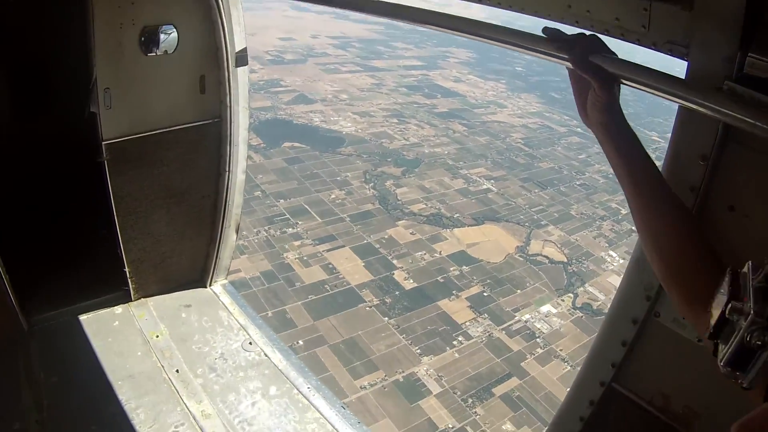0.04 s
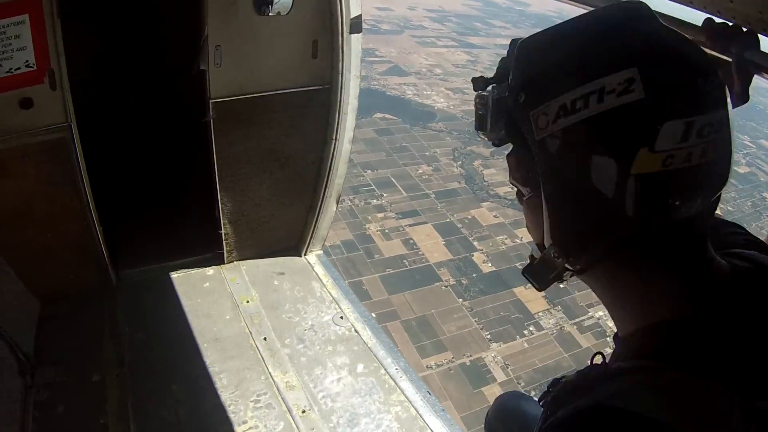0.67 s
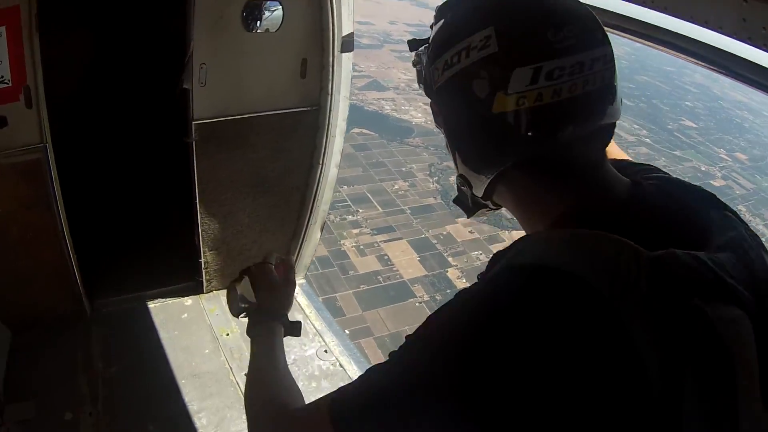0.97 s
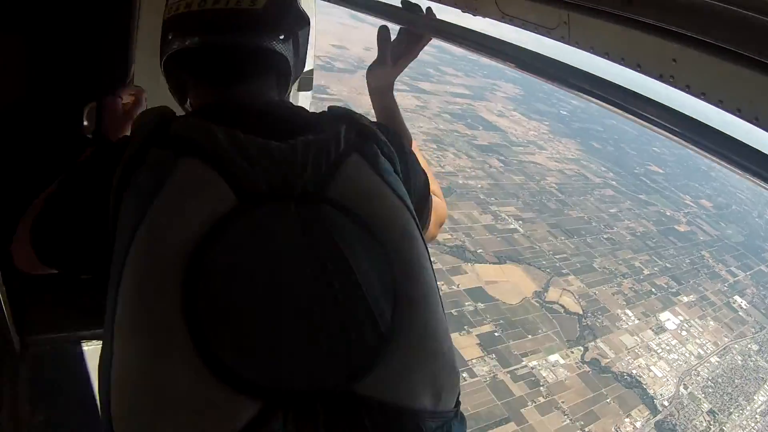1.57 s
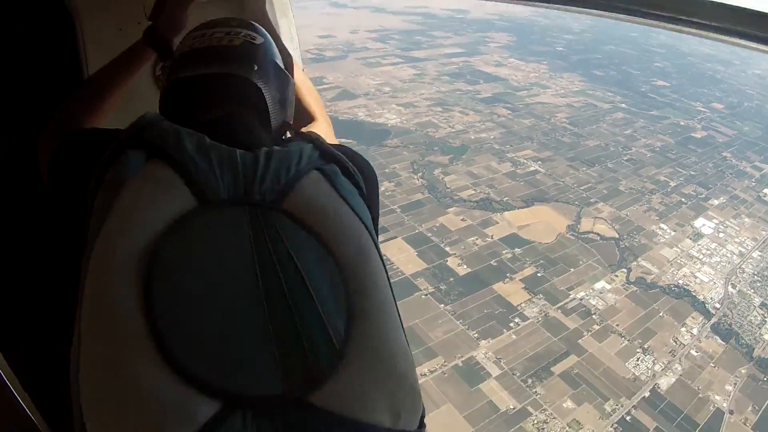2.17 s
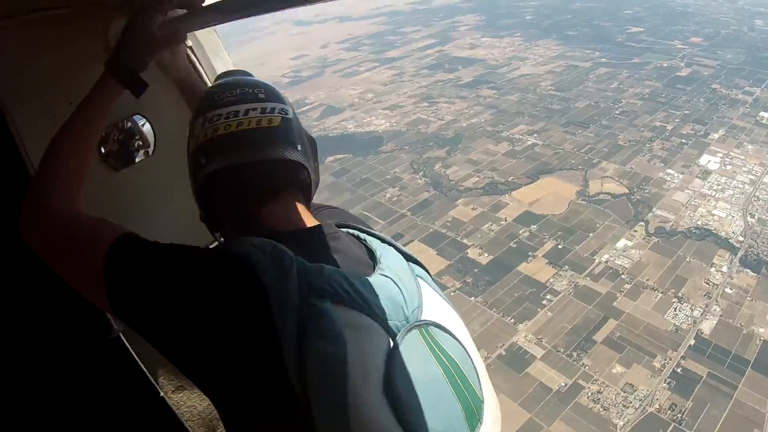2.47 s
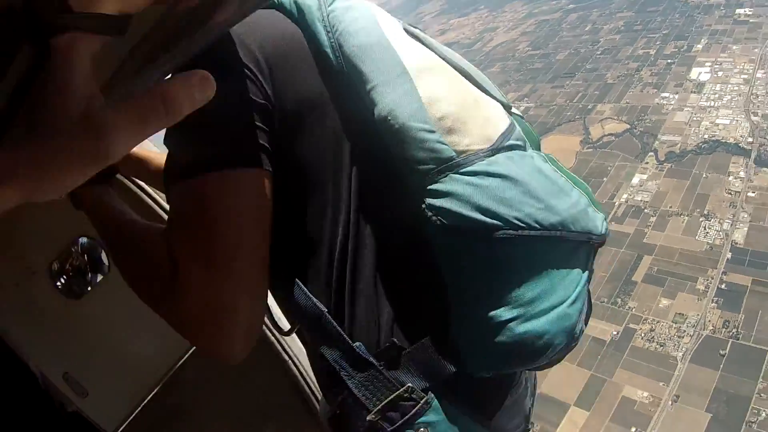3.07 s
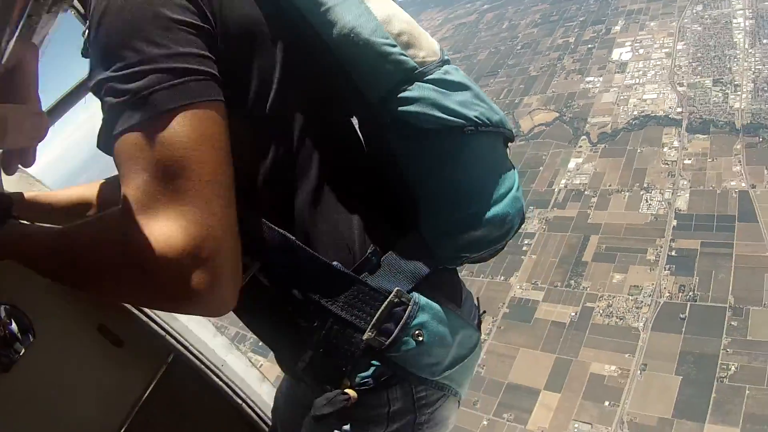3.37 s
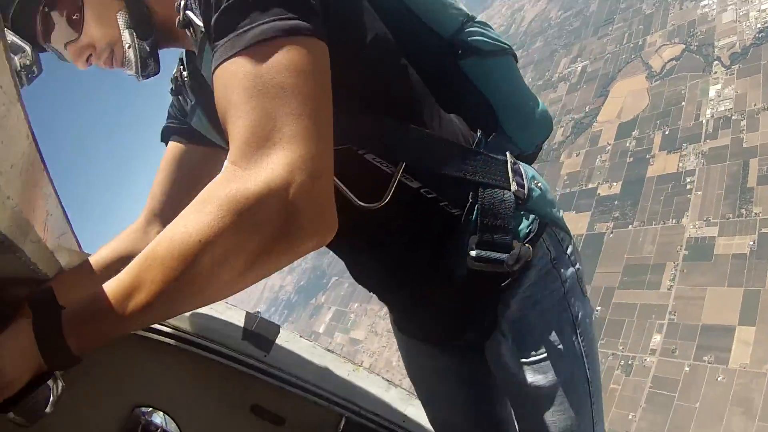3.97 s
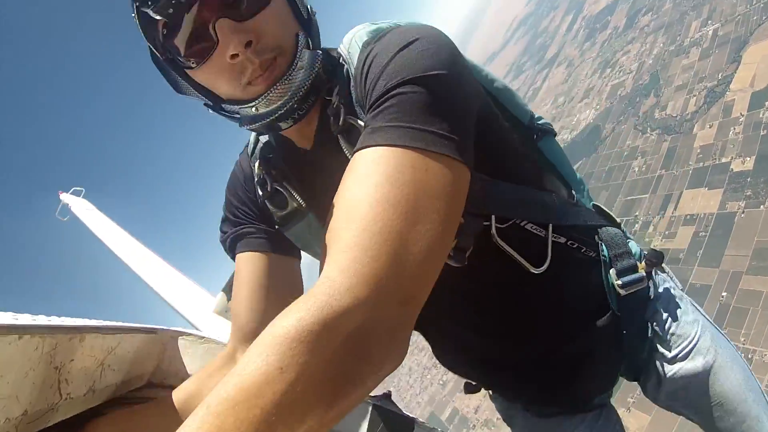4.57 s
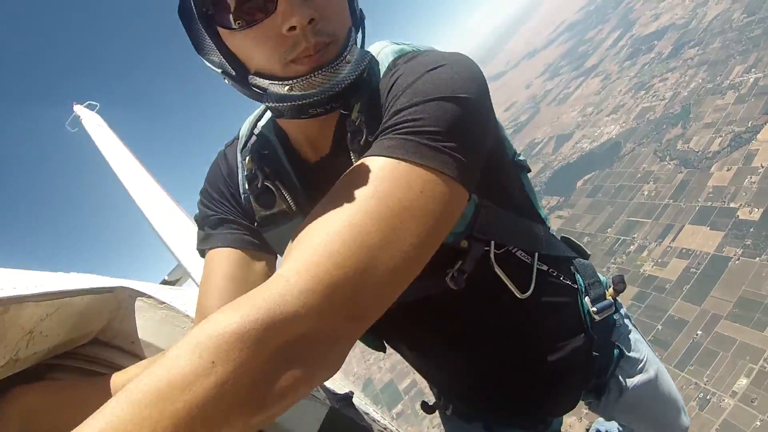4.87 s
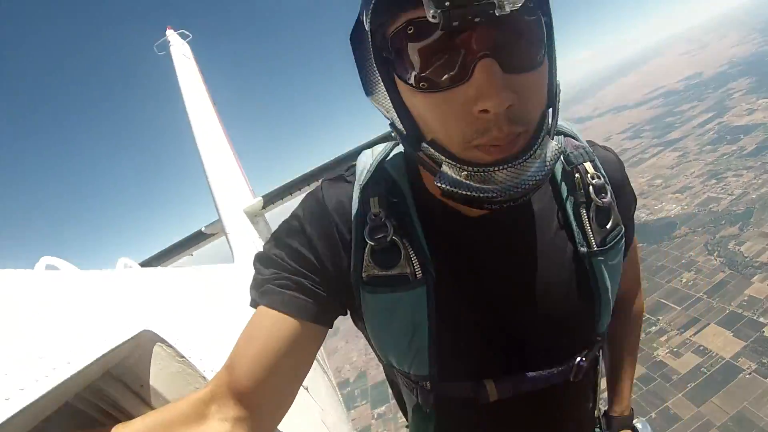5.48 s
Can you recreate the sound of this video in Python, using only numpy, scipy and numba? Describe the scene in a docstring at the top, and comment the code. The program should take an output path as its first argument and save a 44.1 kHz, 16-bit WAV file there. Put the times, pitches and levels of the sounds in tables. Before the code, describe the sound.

An aircraft engine roars and whines through an open door, with brief knocks, until buffeting, crackling wind takes over the microphone.

```python
"""A helmet camera's microphone in a jump plane, close to the open door. A low boom swells throughout. At
first the cabin roars under the turbine's whine, and the slipstream hisses and howls along the door frame.
Around 2 s, knocks on the camera make its limiter duck; then gear scuffs the frame and the hiss swells at
the door. Just after 4 s the microphone is out in the airstream: the aircraft drops behind the wind, and
eddies buffet the port and tear into crackle."""
import sys
import numpy as np
from scipy import signal
from scipy.fft import rfft, irfft
from scipy.io import wavfile
from scipy.ndimage import uniform_filter1d
from numba import njit

SR = 44100
rng = np.random.default_rng(int(sys.argv[2]) if len(sys.argv) > 2 else 0)


def store_wav(level_fs):
    """Save 16-bit WAV to argv[1]."""
    pcm = np.round(np.clip(np.atleast_2d(level_fs), -1, 1) * 32767)
    wavfile.write(sys.argv[1], SR, pcm.T.astype(np.int16))


N = 244314
TIME = np.arange(N) / SR
FREQS = np.maximum(np.arange(N // 2 + 1) * SR / N, 1)

# loudness of slipstream and engine, ducked after the knocks, swelling at the door, fading outside:
# (time [s], relative level [dB])
LOUDNESS = [(0, 0), (1.2, 1.5), (1.9, 0.5), (2.12, -6.5), (2.3, 5), (2.64, 5), (2.72, 4), (3.4, 10.5),
            (3.93, 10.5), (4.08, 8), (4.3, 2.5), (4.7, -4.5), (5.54, -14)]
# engine roar from inside the cabin: (frequency [Hz], relative level [dB])
ROAR_SPECTRUM = [(150, 8), (280, 0), (600, 3), (850, -3), (1350, -4.5), (1700, -12.5), (2350, -10),
                 (2560, -19), (3400, -15), (4200, -22), (6000, -19.5), (8500, -37), (13000, -35),
                 (16000, -60)]
# cabin resonances and narrow engine bands: (frequency [Hz], width [Hz], lift [dB])
CABIN_PEAKS = [(440, 103, 7.5), (1044, 176, 9.5), (1400, 42, 7), (2080, 480, 10), (2412, 15, 12),
               (4750, 120, 6), (5450, 310, 5)]
# air passing the door edge: (frequency [Hz], relative level [dB])
HISS_SPECTRUM = [(500, -18), (1100, 1.5), (1650, -1), (2100, 2.5), (2900, -7.5), (4200, -11), (6200, -15),
                 (7000, -15.5), (9600, -19), (10600, -25.5), (12300, -25), (15500, -37)]
# door frame resonances and one notch: (frequency [Hz], width [Hz], lift [dB])
DOOR_PEAKS = [(1130, 250, -13), (1974, 200, 7.5), (4680, 120, 5), (4900, 130, 9.5), (5540, 73, 2.5),
              (6100, 400, 7), (8100, 300, 4.5)]
# slipstream howling along the frame: (time [s], pitch [Hz])
HOWL_PITCH = [(1.85, 1130), (2.25, 1005), (2.65, 1027), (2.85, 1145), (4.0, 1108)]
# the microphone turns towards the engine: (time [s], length [s], lift [dB])
WHINE_FLARES = [(2.4, 0.99, 7.5), (3.834, 0.52, 9.5)]
# slow pressure swells in the low boom: (time [s], lift [dB])
BOOM_SURGES = [(.58, 5), (.83, 6), (1.158, 5.5), (1.68, 9), (2.02, 17.5), (2.92, 4.5), (3.18, 5), (3.98, 6),
               (4.14, 10), (4.83, 7), (5.24, 8)]
# low air noise at the microphone: (frequency [Hz], relative level [dB])
RUMBLE_SPECTRUM = [(35, -24), (55, 2.5), (85, 0), (110, -5.5), (165, -1.5), (215, -7.5), (280, -21),
                   (500, -34)]
# bumps on the camera: (time [s], strength [dB], settled pitch [Hz], softened above [Hz])
KNOCKS = [(1.9198, 13.5, 141, 3230), (1.932, -1, 200, 705), (1.952, 14.5, 94, 227), (1.977, 12, 45, 143),
          (2.043, -12, 200, 550), (2.1516, 6, 229, 1100), (2.691, -3, 78, 250)]
# ringing of the camera case: (frequency [Hz], level [dB], t60 [s])
CASE_MODES = [(154, -12, 0.21), (239, -19.5, 0.17), (341, -7, 0.02), (467, -41, .045), (629, -17, 0.085),
              (870, -11.5, 0.018)]
# clicks of the plastic mount: (time [s], level [dB])
CLICKS = [(1.922, -24), (1.9588, -21), (1.9675, -40)]
# colour of a click: (frequency [Hz], relative level [dB])
CLICK_SPECTRUM = [(1500, -2), (3200, 0), (4600, -2), (5600, -18), (9000, -20), (15000, -28)]
# gear scuffing the door frame: (time [s], strength [dB])
TAPS = [(2.625, -18), (2.6275, -32), (2.632, -21)]
# ringing of the door frame: (frequency [Hz], level [dB], t60 [s])
FRAME_MODES = [(1040, 3, 0.022), (1180, -5, 0.011), (1940, -6, 0.018), (3060, -28, 0.0098)]
# flow at the microphone port: (time [s], speed [share of full], turbulence [dB])
AIRSTREAM = [(3.8, 0.16, -50), (4.05, 0.59, -44), (4.17, 0.53, -37), (4.22, 0.9, -21), (4.31, 1.09, -17),
             (4.37, 0.99, -11), (4.58, 1.03, -4), (4.92, 0.86, -1), (5.14, 1.1, -2), (5.26, 0.67, -5),
             (5.54, 0.84, -2)]
# gusts tearing at the port: (time [s], lift [dB])
GUSTS = [(4.372, 4.5), (4.475, 4.5), (4.66, 2), (4.782, 4), (4.89, 4), (4.98, 3.5), (5.125, 2), (5.185, 2)]
# the larger swirls: (frequency [Hz], relative level [dB])
CHURN_SPECTRUM = [(120, -1.5), (230, -3), (350, 1), (500, -6.5), (750, -16), (1100, -10.5), (1600, -20.5),
                  (2400, -20.5), (3500, -54)]
# the finest swirls: (frequency [Hz], relative level [dB])
CRACKLE_SPECTRUM = [(500, -0.5), (1100, 8), (1700, 3.5), (2250, 9), (2700, -4), (3300, -2.5), (4300, -9),
                    (6200, -10), (7200, -15), (8000, -14.5), (8600, -20), (9800, -20), (15000, -37)]
# air pockets round the mount: (frequency [Hz], width [Hz], lift [dB])
POCKET_PEAKS = [(714, 82, 19.5), (1010, 91, 8), (3780, 160, 4), (4860, 300, 5)]
# sharp gusts or loose cloth snapping: (time [s], level [dB])
SNAPS = [(4.3505, -24), (4.3745, -23), (4.447, -31), (4.776, -19.5), (4.789, -37), (5.092, -23),
         (5.116, -26)]
# colour of a snap: (frequency [Hz], relative level [dB])
SNAP_SPECTRUM = [(300, -17), (600, 7), (1300, 2.5), (2400, -5), (3400, -19.5), (8000, -34), (14000, -61)]


def from_db(db):
    """Decibels to gain."""
    return 10 ** (np.asarray(db) / 20)


def rms_one(x):
    """Scale to unit rms."""
    return x / np.sqrt(np.mean(x ** 2) + 1e-20)


def in_time(rows):
    """Each column of a curve at every sample."""
    times, *columns = np.transpose(rows)
    return [np.interp(TIME, times, column) for column in columns]


def swell(centre_s, length_s):
    """A smooth rise from 0 to 1 and back."""
    return np.cos(np.pi * np.clip((TIME - centre_s) / length_s, -.5, .5)) ** 2


def noise(gain):
    """Unit noise with the given gain at each frequency."""
    return rms_one(irfft(rfft(rng.standard_normal(N)) * gain, N))


def coloured_noise(spectrum, peaks=()):
    """Unit noise on a broad slope with bell-shaped resonances, rolled off past both ends."""
    hz, db = np.transpose(spectrum)
    slope = np.interp(np.log(FREQS), np.log(hz), db)
    bells = sum(lift / (1 + (2 * (FREQS - centre) / width) ** 2) for centre, width, lift in peaks)
    roll_off = np.minimum(FREQS / hz[0], 1) ** 2 * np.minimum(hz[-1] / FREQS, 1) ** 2
    return noise(from_db(slope + bells) * roll_off)


def band_noise(hz, half_width_hz):
    """Unit noise in a band, like a resonance kept ringing by turbulence."""
    return noise(1 / (1 + ((FREQS - hz) / half_width_hz) ** 4))


def drift(rate_hz):
    """Random wavering up to about the given rate, spread 1."""
    return noise(1 / (1 + (FREQS / rate_hz) ** 2))


def evened(x, seconds):
    """Take the slow swells out of a noise, leaving rms near 1."""
    power = uniform_filter1d(x ** 2, int(seconds * SR))
    return x / np.sqrt(uniform_filter1d(power, int(seconds * SR / 2)) + 1e-9)


@njit
def swept_band(x, hz, damping):
    """A resonator whose centre and damping move."""
    step = 2 * np.pi * hz / SR
    out, low, band = np.zeros(len(x)), 0.0, 0.0
    for i in range(len(x)):
        low += step[i] * band
        band += step[i] * (x[i] - low - damping[i] * band)
        out[i] = band
    return out


def ring(force, modes):
    """A unit impulse sets each mode ringing at its own level."""
    out = np.zeros(N)
    for hz, db, t60 in modes:
        r, w = from_db(-60 / (t60 * SR)), 2 * np.pi * hz / SR
        out += from_db(db) * signal.lfilter([0, np.sin(w)], [1, -2 * r * np.cos(w), r * r], force + 1e-18)
    return out


def puffs(events, spectrum, attack_s, decay_s):
    """Puffs of noise that rise linearly and die exponentially."""
    envelope = np.zeros(N)
    for s, db in events:
        rise = np.clip((TIME - s) / attack_s + 1, 0, 1)
        envelope += from_db(db) * rise * np.exp(-np.clip((TIME - s) / decay_s, 0, 50))
    return envelope * coloured_noise(spectrum)


def cabin_roar(loudness_db):
    """The engine roars through the cabin's resonances, fluttering slightly."""
    flutter_db = 0.86 * drift(20)
    return from_db(-33 + 0.26 * loudness_db + flutter_db) * coloured_noise(ROAR_SPECTRUM, CABIN_PEAKS)


def door_hiss(loudness_db):
    """Air hisses past the door edge, coloured by the frame."""
    return from_db(-45 + loudness_db) * coloured_noise(HISS_SPECTRUM, DOOR_PEAKS)


def door_howl(loudness_db, damping=0.071):
    """The slipstream howls along the frame in one narrow, gliding band."""
    pitch_hz, = in_time(HOWL_PITCH)
    howl = swept_band(band_noise(0, 2000), pitch_hz, np.full(N, damping))
    return from_db(-44.5 + loudness_db) * rms_one(howl)


def turbine_whine(loudness_db, pitch_hz=2320, wander_hz=2.795, flicker_db=2):
    """The governed turbine holds its speed; turbulent air on the way to the microphone makes it waver."""
    phase = 2 * np.pi * np.cumsum(pitch_hz + wander_hz * drift(10.5)) / SR
    flare_db = sum(db * swell(s, length_s) for s, length_s, db in WHINE_FLARES)
    whine = np.zeros(N)
    for harmonic, db, loudness_share in ((1, -57, 0.98), (2, -65, 0.78)):
        tone = rms_one(np.sin(harmonic * phase) * from_db(flicker_db * drift(4.7)))
        whine += from_db(db + loudness_share * loudness_db + flare_db) * tone
    return whine


def compressor(loudness_db):
    """The engine's intake sings, high and airy: a narrow band of noise round a thin tone."""
    tone = from_db(-7) * band_noise(7700, half_width_hz=14)
    return from_db(-59.5 + 0.46 * loudness_db) * (band_noise(7746, half_width_hz=230) + tone)


def low_boom():
    """A low boom with slow pressure swells, in the cabin and out in the airstream."""
    surge_db = sum(db * swell(s, 0.25) for s, db in BOOM_SURGES)
    return from_db(-23.5 + surge_db) * evened(band_noise(33.2, half_width_hz=7.8), 0.068)


def air_rumble(loudness_db, turbulence_db):
    """Air rumbles at the microphone all along, harder in strong turbulence."""
    level_db = -26.5 + 0.21 * loudness_db + 9 * from_db(turbulence_db)
    return from_db(level_db) * evened(coloured_noise(RUMBLE_SPECTRUM), 0.26)


def camera_knocks(contact_s=0.00069, stiffening=3.06, t60_cycles=3.5):
    """Each bump rocks the camera on its mount for a cycle or so; the case rings on briefly."""
    rocking, t = np.zeros(N), TIME[:SR // 8]
    pressed = 1 - np.exp(-t / contact_s)
    # pressed hard, the mount is stiffer: the pitch starts high and sags
    hurried = t + stiffening * contact_s * pressed
    for s, db, hz, soft_hz in KNOCKS:
        envelope = pressed * from_db(db - 60 * hz * t / t60_cycles)
        swing = envelope * np.sin(2 * np.pi * hz * hurried)
        softening = signal.butter(5, soft_hz, fs=SR, output="sos")
        start = round(s * SR)
        rocking[start:start + len(swing)] += signal.sosfilt(softening, swing)
    # the case is driven by how fast the mount moves
    return rocking + ring(np.diff(rocking, prepend=0) / 2, CASE_MODES)


def mount_clicks():
    """The plastic mount clicks right beside the microphone."""
    return puffs(CLICKS, CLICK_SPECTRUM, attack_s=0.00017, decay_s=0.00088)


def frame_taps():
    """Hard little contacts of gear ring the door frame."""
    force = np.zeros(N)
    for s, db in TAPS:
        force[round(s * SR)] = from_db(db)
    return ring(force, FRAME_MODES)


def shed_eddies(speed, breakup, full_speed_hz=130.2):
    """Eddies are shed at a rate proportional to speed; their throb blurs as the flow breaks up."""
    rate_hz = full_speed_hz * np.abs(speed)
    damping = 0.53 + 0.23 * breakup
    throb = swept_band(rng.standard_normal(N), rate_hz, damping)
    return evened(swept_band(throb, rate_hz, damping), 0.056)


def port_wind(speed, turbulence_db, onset_speed=0.52, burst_db=4.5):
    """Outside, eddies strike the microphone port and tear off bursts of noise."""
    breakup = from_db(turbulence_db)
    eddies = shed_eddies(speed, breakup)
    striking = speed ** 4 / (speed ** 4 + onset_speed ** 4)
    buffet = from_db(-14 - 5 * breakup) * eddies
    # fine turbulence comes in bursts, strongest at the suction peak of an eddy
    suction = np.tanh(np.maximum(-eddies, 0))
    bursts = evened((1 + 0.99 * suction ** 2) * from_db(burst_db * np.tanh(drift(97))), 0.066)
    gust_db = sum(db * swell(s, 0.11) for s, db in GUSTS)
    # the larger swirls are less intermittent than the finest ones
    swirls = evened(np.sqrt(bursts) * coloured_noise(CHURN_SPECTRUM), 0.035)
    churn = from_db(-22 + turbulence_db + 0.7 * gust_db) * swirls
    fine_db = 0.31 * turbulence_db + gust_db + 0.5 * drift(11)
    crackle = from_db(-35 + fine_db) * bursts * coloured_noise(CRACKLE_SPECTRUM, POCKET_PEAKS)
    # a faint edge tone where the airstream crosses the helmet
    whistle = from_db(-50.5 + fine_db) * np.sqrt(bursts) * band_noise(2895, half_width_hz=81)
    return churn + striking * (buffet + crackle + whistle)


def airstream_snaps():
    """Sharp gusts or loose cloth snap close to the microphone."""
    return puffs(SNAPS, SNAP_SPECTRUM, attack_s=0.001, decay_s=0.0044)


def limiter(x, threshold_db, release_db_per_s, attack_s):
    """Peaks over the threshold pull the gain down fast; it climbs back at a steady rate."""
    over_db = np.maximum(20 * np.log10(np.abs(x) + 1e-9) - threshold_db, 0)
    release_db = release_db_per_s * TIME
    held_db = np.maximum.accumulate(over_db + release_db, axis=-1) - release_db
    pole = np.exp(-1 / (attack_s * SR))
    return x * from_db(-signal.lfilter([1 - pole], [1, -pole], held_db))


def scene(exit_s=4.11, exit_takes_s=0.066):
    """Everything at the one helmet microphone, from the cabin out into the airstream."""
    loudness_db, = in_time(LOUDNESS)
    speed, turbulence_db = in_time(AIRSTREAM)
    outside = np.clip((TIME - exit_s) / exit_takes_s + .5, 0, 1)   # 1 once clear of the door frame
    boom = from_db(-1 * outside) * low_boom()
    wind = air_rumble(loudness_db, turbulence_db) + port_wind(speed, turbulence_db)
    impacts = camera_knocks() + mount_clicks() + frame_taps() + airstream_snaps()
    aircraft = cabin_roar(loudness_db) + door_hiss(loudness_db) + door_howl(loudness_db)
    aircraft += turbine_whine(loudness_db)
    intake = from_db(-5 * outside) * compressor(loudness_db)
    return (from_db(-7.5 * outside) * aircraft + intake + boom + wind + impacts)[None]


def record(dry, cutoff_hz=15400):
    """The camera's limiter ducks, what outruns it clips, the ends fade quickly and the top is cut."""
    limited = limiter(dry, threshold_db=-7.0, release_db_per_s=91.0, attack_s=0.011)
    clipped = np.clip(limited, -1, 1)
    fade_in = from_db(np.interp(TIME, [0, .055], [-12, 0]))
    fade_out = np.minimum(TIME[::-1] / .004, 1)
    low_pass = signal.ellip(10, .1, 80, cutoff_hz, fs=SR, output="sos")
    return signal.sosfilt(low_pass, clipped * fade_in * fade_out)


dry = scene()
out = record(dry)
store_wav(out)
```